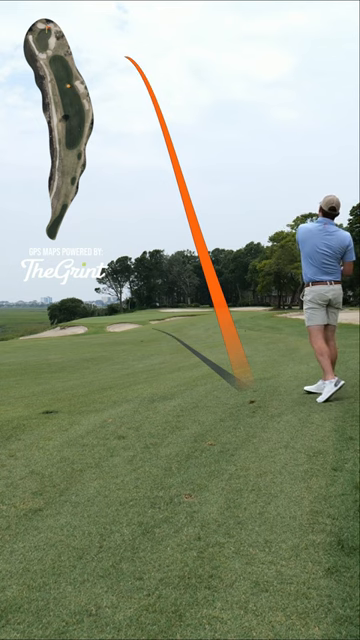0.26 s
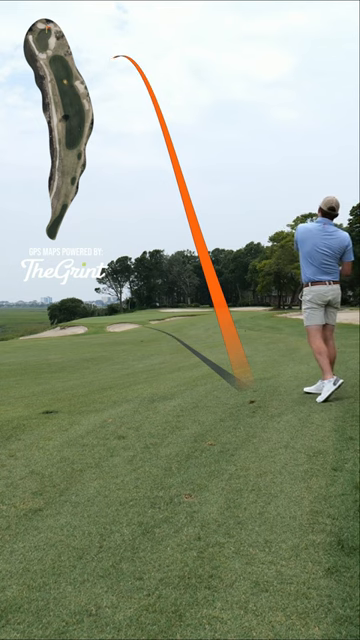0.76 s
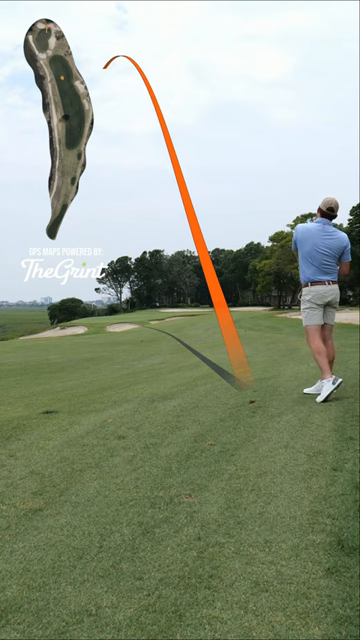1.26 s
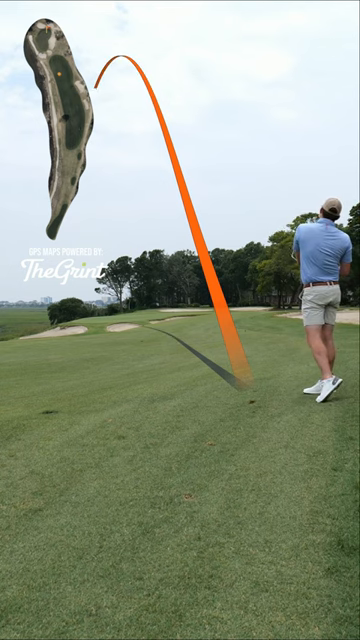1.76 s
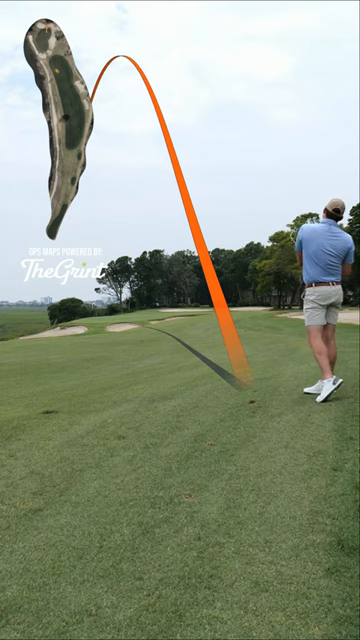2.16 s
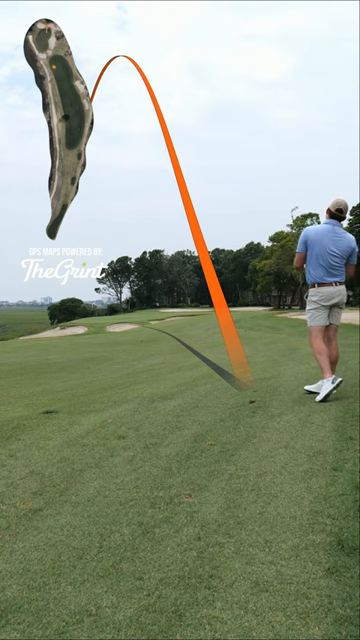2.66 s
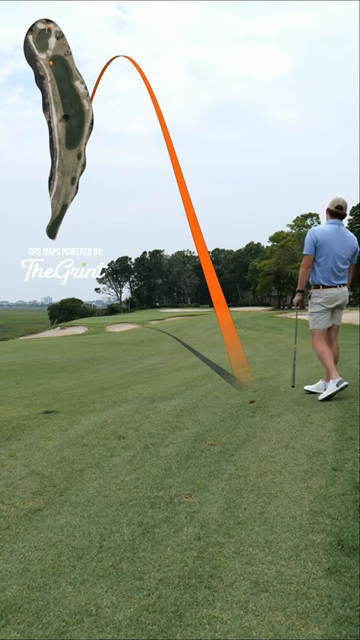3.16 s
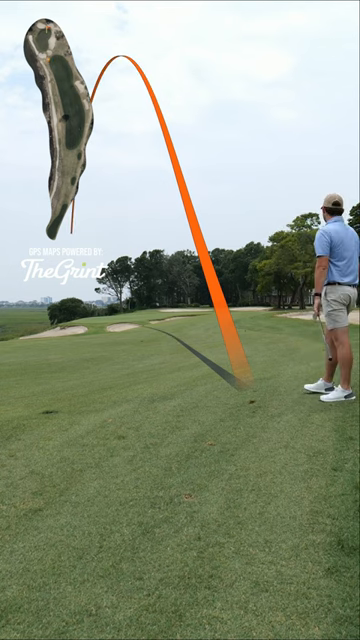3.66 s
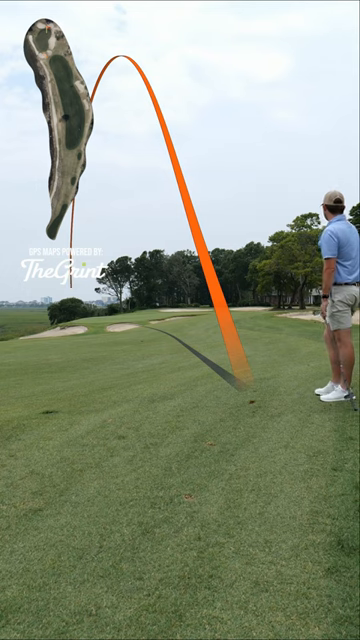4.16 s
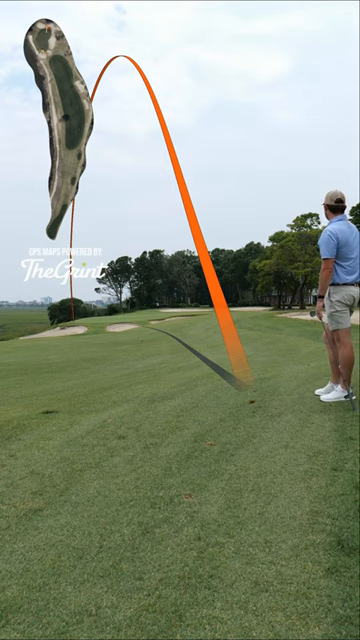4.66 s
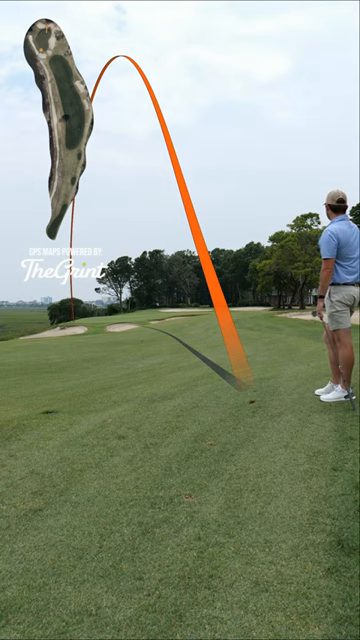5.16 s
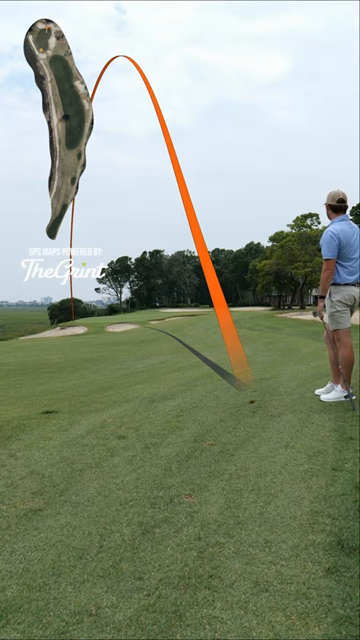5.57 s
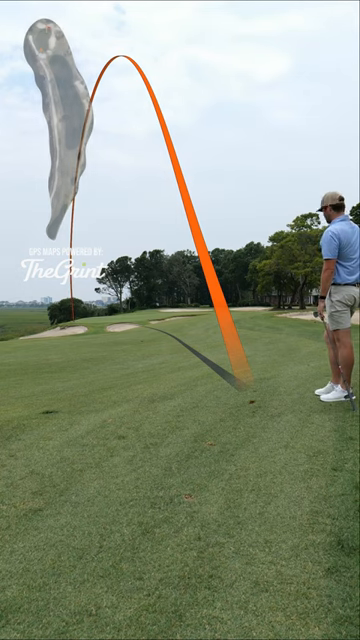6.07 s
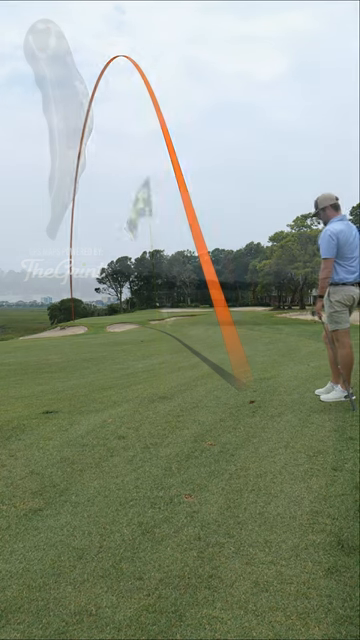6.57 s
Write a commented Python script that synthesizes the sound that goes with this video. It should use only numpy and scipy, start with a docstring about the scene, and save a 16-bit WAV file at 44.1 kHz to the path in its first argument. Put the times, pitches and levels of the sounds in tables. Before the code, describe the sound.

A soft, dark outdoor hush runs throughout, with low wind rumble at the microphone. At 0.03 and 0.36 seconds a clear bird whistles near 2.9 kilohertz, each scoop and drop followed by a short lower note, echoing off trees. From 0.3 to 4 seconds another bird gives tiny wavy pips roughly every 0.3 seconds; extremely faint peeps sound far away. Wind eases from about 1 to 2.9 seconds. A thin, distant machine whine wavers in and out from 1.4. A small dry tick comes at 2.6, a faint grass brush at 3.1, lighter ones at 3.85 and 4.1, another tick at 5.0. Wind returns around 3, with deep buffets at 3.8, 4.35, 5.2, 5.5, 6.1 and 6.3. From 4.3 the pips become sharp falling double chips. The whistler returns at 5.4, 5.65 and 5.95. Sound fades from about 6.3, with a falling bird slur at 6.7, ending at 6.8.

```python
"""A golf fairway beside a marsh: a steady hush of coloured noise under gusts of turbulence at the microphone.
First one bird whistles two phrases and another starts to pip, all echoed by trees, with faint peeps far off.
A far machine, perhaps a mower, then swells as a wavering sine; shoe and club brush the turf as noise bursts.
The pips give way to double chips, the whistler returns, and a falling slur is heard near the end in the fade.
Birds are gliding sines convolved with a response of echoes and decaying noise; ticks are damped sines."""
import sys
import numpy as np
from scipy import signal
from scipy.fft import rfft, irfft
from scipy.io import wavfile
from scipy.ndimage import uniform_filter1d

SR = 44100
rng = np.random.default_rng(int(sys.argv[2]) if len(sys.argv) > 2 else 0)


def put_to_file(sound):
    """Save the sound as 16-bit audio at rate SR, in the file named by the first command-line argument."""
    columns = np.atleast_2d(sound).T  # one column per channel
    safe = np.clip(columns, -1, 1)
    whole_steps = np.round(safe * 32767)
    wavfile.write(sys.argv[1], SR, whole_steps.astype(np.int16))


N = 300746
T = np.arange(N) / SR  # time axis, s

# All levels below are those before the closing fade.
# Relative spectrum of the outdoor hush: frequency_hz, level_db
HUSH_SPECTRUM = [(20, -30), (70, 0), (100, -3), (135, -6), (190, -2.5), (310, -10.5), (500, -12.5),
                 (800, -18.5), (1300, -23.5), (2000, -30), (3000, -32.5), (4200, -35), (5200, -40),
                 (15500, -43.5)]
# Far machine's whine as the wind carries it: time_s, level_db (before WHINE_DB is added)
WHINE_LEVEL = [(0.0, -82), (1.27, -82.5), (1.4, -69), (1.6, -69), (1.73, -79.5), (1.96, -65), (2.12, -80),
               (2.55, -63), (2.72, -64), (2.93, -80.5), (2.99, -58.5), (3.3, -71.5), (3.39, -73),
               (3.48, -68.5), (3.7, -63.7), (3.78, -76), (3.86, -66), (4.4, -72), (4.49, -79),
               (4.85, -69.5), (5.05, -85), (5.45, -76.5), (5.53, -62.3), (5.82, -69.5), (5.92, -83),
               (6.02, -64), (6.32, -76.5), (6.55, -63), (6.8, -75.5)]
# Fainter machine tones: start_s, end_s, pitch_hz, level_db
MACHINE_TONES = [(.2, 1.6, 198, -57), (1.9, 3.1, 1573, -76), (2.6, 4.3, 1398, -78), (4.3, 6.8, 1398, -75)]
# Relative spectrum of brushed grass: frequency_hz, level_db
TURF_SPECTRUM = [(300, 5), (1200, -3), (2400, 1.5), (5000, -10), (9000, -18), (15000, -21)]
# Shoe and club brushing the grass: centre_s, half_length_s (to 1/e), level_db
BRUSHES = [(3.085, 0.042, -63.5), (3.114, 0.16, -69.5), (3.846, 0.025, -70), (4.1, 0.018, -66)]
# Small dry ticks: start_s, pitch_hz, starting_envelope_db
TICKS = [(2.574, 3380, -48), (5.031, 1870, -43.5)]
# Strength of the wind at the microphone: time_s, level_db (before the eddy offsets)
WIND_STRENGTH = [(0.0, -34.5), (0.28, -33.5), (1.08, -43), (1.54, -41.5), (1.62, -47), (2.88, -44.5),
                 (2.98, -34), (3.26, -39), (3.32, -42.5), (3.64, -39.5), (3.8, -34), (4.28, -34.5),
                 (4.36, -31), (5.52, -30.5), (5.68, -35.4), (6.06, -28.5), (6.48, -32.5), (6.8, -33.9)]
# Single hard buffets: centre_s, peak_db, pitch_hz
BUFFETS = [(3.814, -20.5, 62), (4.349, -23, 84), (5.207, -21.5, 51), (5.47, -24.5, 60),
           (6.074, -24.5, 50.5), (6.328, -22, 51.6)]
# Relative spectra of large and of small eddies: frequency_hz, level_db
LARGE_EDDIES = [(10, -35), (20, 0.5), (33, -5), (48, 8), (70, 2), (98, 4.5), (120, -5), (150, -24),
                (300, -44), (1500, -100)]
SMALL_EDDIES = [(75, -6.5), (120, 2), (165, -4), (220, -14), (300, -22.5), (500, -38), (1200, -44),
                (5000, -100)]
# Discrete reflections off the trees: delay_s, level_db (before echo_db is added)
ECHOES = [(0.018, -9), (0.126, -37), (0.17, -25.5), (0.302, -27.5)]

# Shapes of the notes: share_of_length, glide_hz (above the note's pitch), swell_db
WHISTLE_SHAPE = [(0, -12, 5), (.13, -155, -3), (.33, -63.5, -2), (.70, 16, -0.5), (.82, -100, -5.5),
                 (.89, -400, -8), (.95, -820, -23), (1, -850, -24)]
LOW_SHAPE = [(0, -33, -8), (.25, 10, -1.5), (.65, -14, -4.5), (1, -29, -12)]
PIP_SHAPE = [(0, 603, -15), (.15, 332, -9.5), (.30, -47, 1), (.44, -130, 2.5), (.62, 134, 1.5),
             (.76, -130, -8), (.9, -540, -6.5), (1, -660, -10)]
CHIP_SHAPE = [(0, 1096, -23), (.2, 769, -11.5), (.42, 210, -2), (.82, -830, -6), (1, -1200, -12)]
HOOK_SHAPE = [(0, 598, -11), (.2, 299, -2.5), (.45, 52, 0), (.75, -90, -1), (1, -160, -9)]
SLUR_SHAPE = [(0, 1390, -3), (.07, 850, -11), (.55, -200, -1), (.72, -500, 0), (.85, -1280, 1.5),
              (1, -1420, 0)]
# Note levels are rms, before the swell of the shape.
# Peeps of far birds: start_s, length_s, pitch_hz, level_db
FAR_PEEPS = [(0.923, 0.07, 3680, -77), (1.26, 0.11, 3740, -69.5), (2.62, 0.18, 3700, -74),
             (3.46, 0.15, 4400, -78), (4.1, .14, 6850, -81)]
# A falling slur near the end: start_s, length_s, pitch_hz, level_db
SLURS = [(6.695, .125, 3650, -54)]
# The piper's pips: start_s, level_db
PIPS = [(0.33, -55.5), (0.625, -53.5), (.885, -56), (1.207, -55), (1.563, -50), (1.9, -57), (2.172, -62.5),
        (2.429, -59), (2.693, -57.5), (3.058, -55), (3.362, -57), (3.685, -52.5), (4.007, -53)]
# Its double calls, a chip then a hook: start_s, chip_level_db, hook_level_db
DOUBLE_CALLS = [(4.309, -52.5, -53), (4.611, -50, -52.5), (4.901, -47, -50), (5.217, -51.5, -58),
                (5.672, -50, -63), (5.995, -49.5, -61), (6.297, -55, -56.5), (6.654, -50.5, -54.5)]
# The whistler's phrases: start_s, whistle_length_s, whistle_pitch_hz, whistle_level_db,
# low_length_s, low_pitch_hz, low_level_db
PHRASES = [(0.03, .17, 2956, -41, .061, 2310, -51), (0.361, 0.17, 2924, -40, 0.052, 2264, -52.5),
           (5.399, 0.076, 2946, -42, 0.065, 2384, -49.5), (5.638, .165, 2965, -40.5, .06, 2320, -49.5),
           (5.963, .163, 2935, -40, 0.055, 2280, -55)]
# Closing fade: time_s, level_db
FADE = [(6.33, -1), (6.55, -7.5), (6.8, -16.5)]

HUSH_DB = -51
WHINE_HZ, WHINE_DB = 1763.5, 4.5
# Small eddies grow faster than the wind (dB per dB) and lie FLUTTER_DB under it in a full gust.
RUMBLE_DB, FLUTTER_DB, FLUTTER_GROWTH, GUST_DB = -2, -7, 1.62, -31
PIP_S, PIP_HZ = 0.046, 2892
CHIP_S, CHIP_HZ = 0.038, 3465
HOOK_DELAY_S, HOOK_S, HOOK_HZ = 0.041, 0.0343, 2946  # delay counts from the start of the chip
FULL_WHISTLE_S, PHRASE_GAP_S = 0.16, 0.014  # a shorter whistle skips its opening; rest before the low note
WHISTLER_TREES = dict(t60=1.55, near_db=-16)  # decay time in s, level of the near blur in dB
TOP_HZ = 15700  # upper band edge


def undb(db):
    """Logarithmic level: decibels become an amplitude gain."""
    return 10 ** (np.asarray(db) / 20)


def curve(rows):
    """Linear interpolation: rows of (time_s, value) are joined by straight lines."""
    return np.interp(T, *np.transpose(rows))


def sine(pitch_hz):
    """Phase is the running integral of frequency; the sine has peak 1."""
    return np.sin(2 * np.pi * np.cumsum(pitch_hz) / SR)


def noise(spectrum):
    """Spectral shaping: white noise is weighted by a spectrum and scaled to rms 1."""
    table_hz, table_db = np.transpose(spectrum)
    bins_hz = np.maximum(np.arange(N // 2 + 1) * SR / N, 1)
    level_db = np.interp(np.log(bins_hz), np.log(table_hz), table_db)
    x = irfft(rfft(rng.standard_normal(N)) * undb(level_db), N)
    return x / x.std()


def walk(rate_hz):
    """Band-limited fluctuation: Gaussian low-pass noise of zero mean and standard deviation 1."""
    bins_hz = np.arange(N // 2 + 1) * SR / N
    x = irfft(rfft(rng.standard_normal(N)) * np.exp(-(bins_hz / rate_hz) ** 2), N)
    return (x - x.mean()) / x.std()


def add(out, start_s, x):
    """Superposition: x is summed into out from start_s, cut at the end of out."""
    i = max(int(start_s * SR), 0)
    out[i:i + len(x)] += x[:max(len(out) - i, 0)]


def trees(x, scatter_db, echo_db, t60=2.1, near_db=-13, near_t60=0.079):
    """Reverberation: near scattering blurs a note; the tree line adds discrete echoes and a decaying tail."""
    t = T[:SR]  # the response lasts 1 s
    near = rng.standard_normal(SR) * np.exp(-np.log(1000) * t / near_t60)
    tail = rng.standard_normal(SR) * np.exp(-np.log(1000) * t / t60)
    response = undb(near_db) * near / np.linalg.norm(near)
    response += undb(scatter_db) * tail / np.linalg.norm(tail)
    for delay_s, db in ECHOES:
        add(response, delay_s, undb([db + echo_db]))
    return x + signal.fftconvolve(x, response)[:N]


def notes(shape, table, waver_hz=12, flicker_db=1, full_s=0, ease_s=0.0013):
    """Frequency and amplitude modulation: unsteady sines glide along one shape.

    A note shorter than full_s starts part-way into the shape."""
    share, glide_hz, swell_db = np.transpose(shape)
    waver = waver_hz * walk(120)
    flicker = flicker_db * walk(74)
    out = np.zeros(N)
    for start_s, length_s, hz, db in table:
        first_share = 1 - length_s / max(length_s, full_s)
        u = np.linspace(first_share, 1, int(length_s * SR))
        now = (int(start_s * SR) + np.arange(len(u))) % N
        glide = uniform_filter1d(hz + np.interp(u, share, glide_hz), size=130)  # rounds the corners
        gain = undb(db + np.interp(u, share, swell_db) + flicker[now])
        gain = gain * signal.windows.tukey(len(u), 0.08)
        gain = gain * np.minimum(T[:len(u)] / ease_s, 1)  # linear onset
        add(out, start_s, np.sqrt(2) * gain * sine(glide + waver[now]))
    return out


def hush():
    """Stationary noise: the steady outdoor background has a fixed spectrum and level."""
    return noise(HUSH_SPECTRUM) * undb(HUSH_DB)


def machine(waver_hz=2.33, flutter_db=2.12):
    """Propagation through moving air: a far whine and fainter tones waver, swell and sink."""
    whine_db = WHINE_DB + curve(WHINE_LEVEL) + flutter_db * walk(20)
    out = undb(whine_db) * sine(WHINE_HZ + waver_hz * walk(16))
    for start_s, end_s, hz, db in MACHINE_TONES:
        gate = np.clip(np.minimum(T - start_s, end_s - T) / 0.33, 0, 1)  # 0.33 s ramps
        tone = sine(hz + waver_hz * walk(16.2))
        out = out + gate * undb(db + 3.4 * walk(6.9)) * tone
    return np.sqrt(2) * out  # table levels are rms


def turf(grain_db=4):
    """Friction and impact: brushed grass crackles as modulated noise; dry ticks are damped sines."""
    pressure = sum(undb(db) * np.exp(-((T - s) / half_s) ** 2) for s, half_s, db in BRUSHES)
    out = pressure * noise(TURF_SPECTRUM) * undb(grain_db * walk(300))
    t = T[:SR // 50]
    for start_s, hz, db in TICKS:
        add(out, start_s, undb(db) * np.exp(-t / 0.00078) * np.sin(2 * np.pi * hz * t))
    return out


def eddies(spectrum, size=5000):
    """Power normalization: turbulence noise is evened by its running rms over about a tenth of a second."""
    x = noise(spectrum)
    power = uniform_filter1d(uniform_filter1d(x ** 2, size), size // 2)
    return x / np.sqrt(power)


def wind(throb_db=0.9, lump_db=1.45):
    """Turbulent pressure: one wind drives large and small eddies; a passing vortex pushes, then sucks."""
    strength = curve(WIND_STRENGTH)
    large_db = strength + RUMBLE_DB + lump_db * walk(12)
    small_db = GUST_DB + FLUTTER_DB + FLUTTER_GROWTH * (strength - GUST_DB)
    out = eddies(LARGE_EDDIES) * undb(large_db) + eddies(SMALL_EDDIES) * undb(small_db)
    out = out * undb(throb_db * walk(10.5))
    for centre_s, db, hz in BUFFETS:
        u = 2 * np.pi * hz * (T - centre_s)
        out = out - undb(db) * u * np.exp((1 - u ** 2) / 2)  # extremes at u = -1 and 1
    return out


def far_birds():
    """Strong reverberation relative to direct sound: faint peeps seem far off."""
    peeps = notes(LOW_SHAPE, FAR_PEEPS, waver_hz=25, flicker_db=1.5)
    return trees(peeps, scatter_db=-4, echo_db=-2, near_db=-8)


def falling_slur():
    """Downward frequency glide: a sine falls steeply near the end, with a reverberant tail."""
    slurs = notes(SLUR_SHAPE, SLURS, waver_hz=40, flicker_db=3.0)
    return trees(slurs, scatter_db=-5.5, echo_db=-5.0, t60=3.8, near_db=-6.5)


def piper():
    """Rapid frequency glides: wavy pips come first, then sharp chips, each trailed by a hook."""
    pip_rows = [(s, PIP_S, PIP_HZ, db) for s, db in PIPS]
    chip_rows = [(s, CHIP_S, CHIP_HZ, db) for s, db, _ in DOUBLE_CALLS]
    hook_rows = [(s + HOOK_DELAY_S, HOOK_S, HOOK_HZ, db) for s, _, db in DOUBLE_CALLS]
    pips = notes(PIP_SHAPE, pip_rows, waver_hz=21, flicker_db=0.5)
    chips = notes(CHIP_SHAPE, chip_rows, waver_hz=30, flicker_db=0.5)
    hooks = notes(HOOK_SHAPE, hook_rows, waver_hz=17, flicker_db=2.6)
    return (trees(pips + hooks, scatter_db=-11.5, echo_db=-6.5, near_db=-12)
            + trees(chips, scatter_db=-5.5, echo_db=-5.0, t60=3.8, near_db=-6.5))


def whistler():
    """Pure-tone glides: a whistle scoops, rises and drops away; after a rest comes a nearly level low note."""
    high_rows = [(s, length_s, hz, db) for s, length_s, hz, db, *_ in PHRASES]
    low_rows = [(s + length_s + PHRASE_GAP_S, *low) for s, length_s, _, _, *low in PHRASES]
    whistles = notes(WHISTLE_SHAPE, high_rows, waver_hz=9.7, flicker_db=0.3,
                     full_s=FULL_WHISTLE_S, ease_s=0.036)
    low_notes = notes(LOW_SHAPE, low_rows, waver_hz=7.5, flicker_db=1.5, ease_s=0.0048)
    return (trees(whistles, scatter_db=-10.0, echo_db=-1.5, **WHISTLER_TREES)
            + trees(low_notes, scatter_db=-6.5, echo_db=0, **WHISTLER_TREES))


def scene():
    """Linear superposition: all sources add, from the background to the birds."""
    background = hush() + machine() + turf() + wind()
    calls = far_birds() + falling_slur() + piper() + whistler()
    return (background + calls)[None]


def record(dry):
    """Attenuation and band limiting: the level fades at the end and a steep low-pass cuts the top."""
    low_pass = signal.ellip(10, 0.1, 80, TOP_HZ, fs=SR, output="sos")
    return signal.sosfilt(low_pass, dry * undb(curve(FADE)))


dry = scene()
out = record(dry)
put_to_file(out)
```